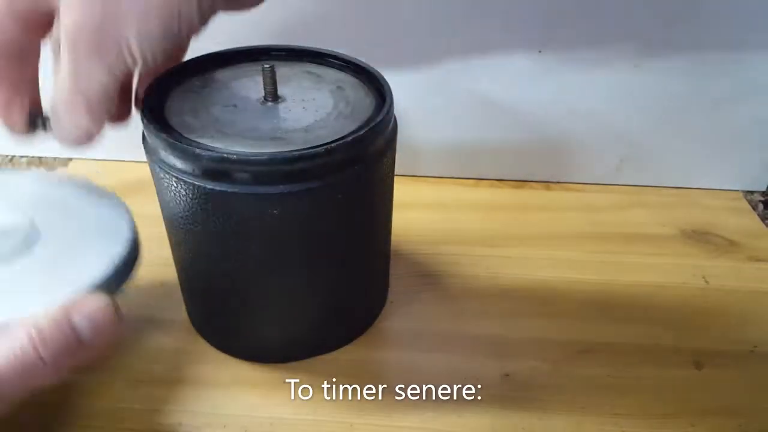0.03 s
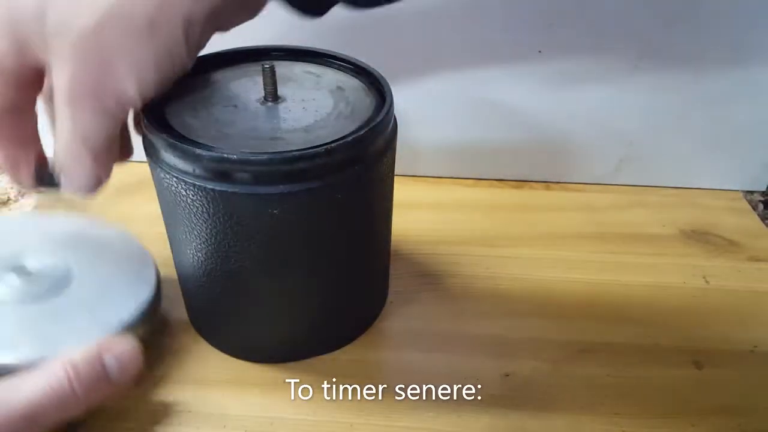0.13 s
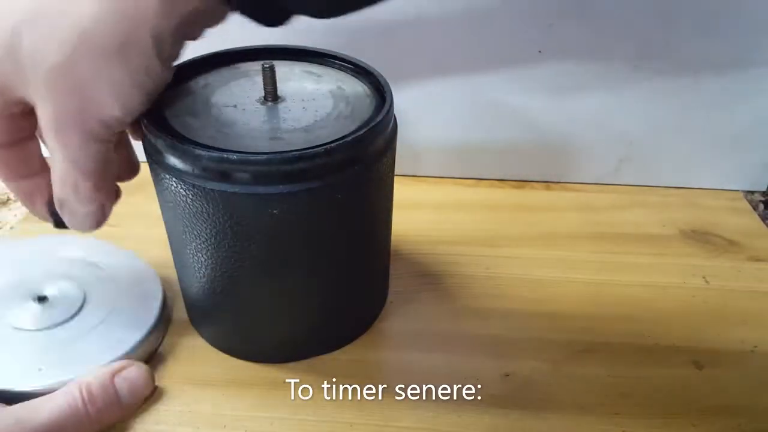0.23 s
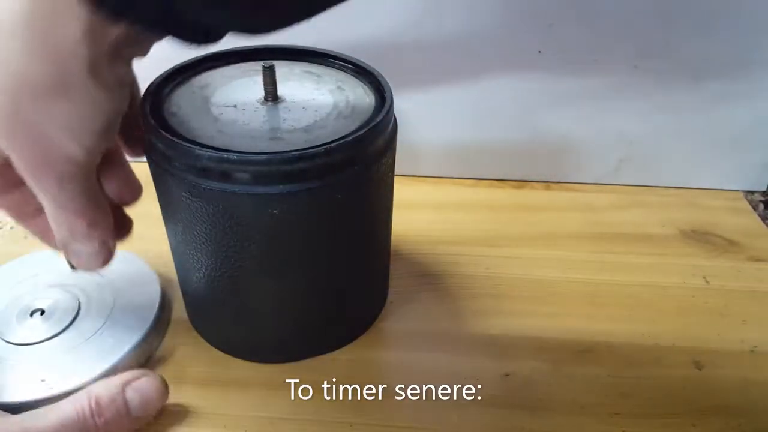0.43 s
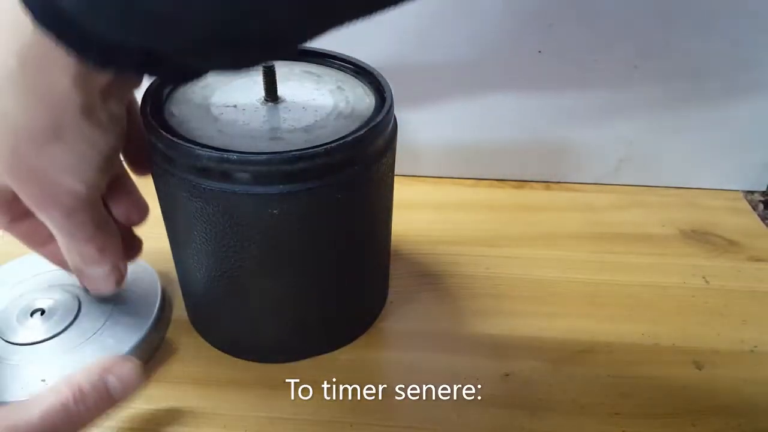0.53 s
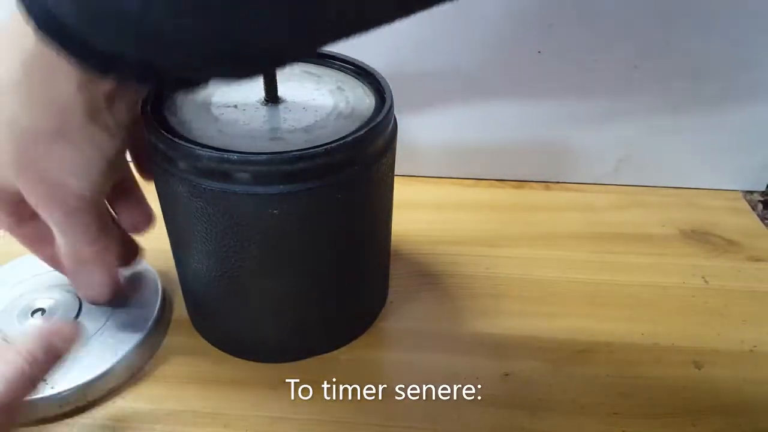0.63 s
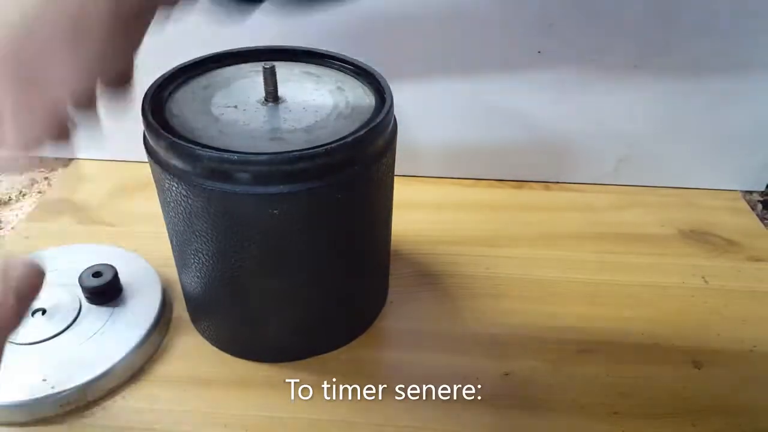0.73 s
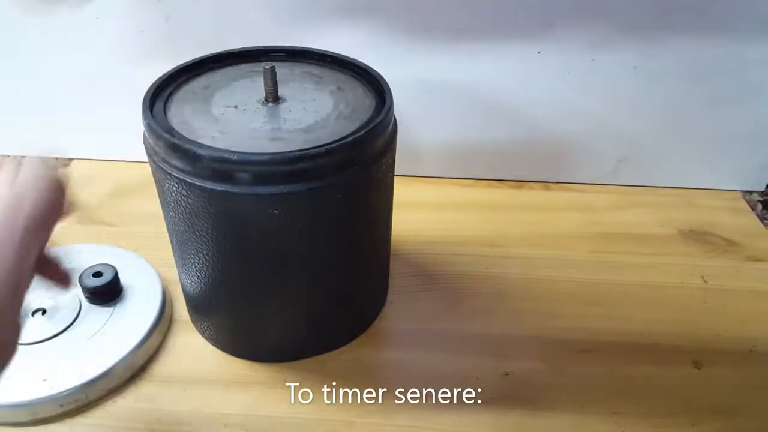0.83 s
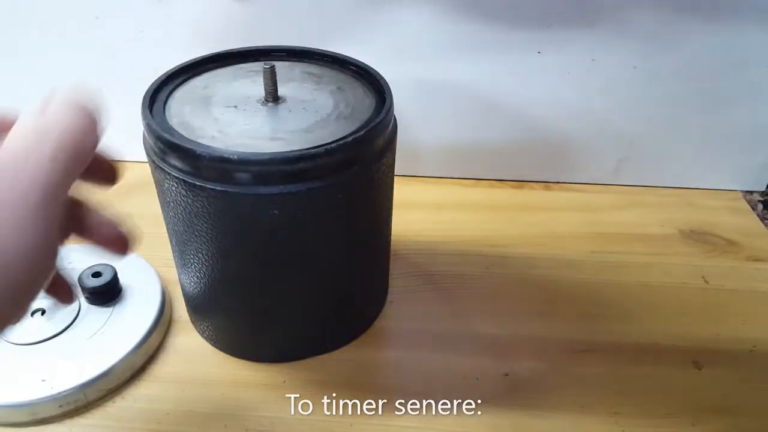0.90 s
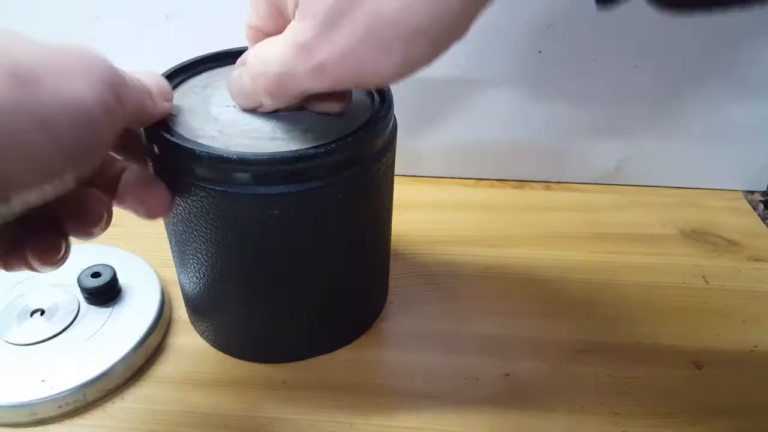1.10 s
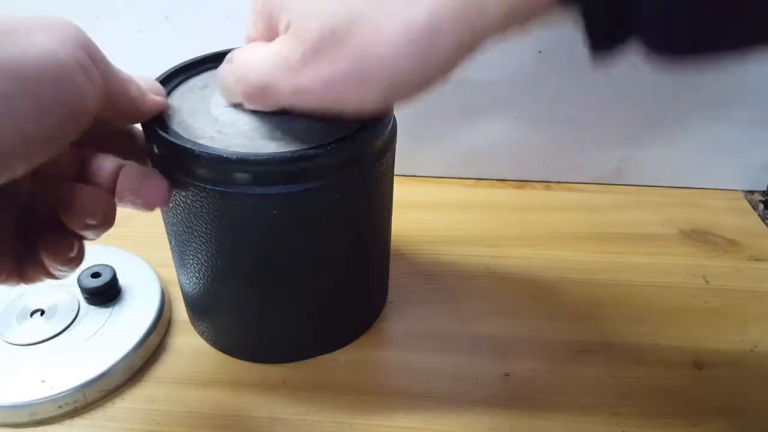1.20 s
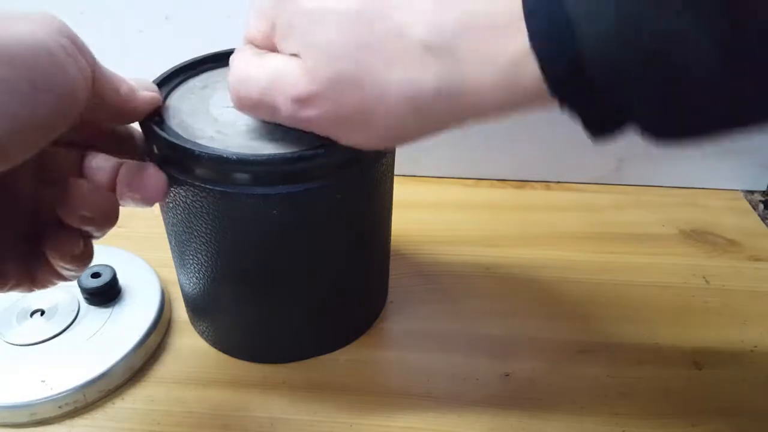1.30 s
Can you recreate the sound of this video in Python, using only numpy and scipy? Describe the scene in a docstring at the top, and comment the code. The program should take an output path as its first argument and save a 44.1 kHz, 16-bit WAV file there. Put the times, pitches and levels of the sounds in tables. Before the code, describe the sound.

Metal lid clinks and rattles flat on wood, followed by a small knob bouncing.

```python
"""In a small dry room with a faint mains hum, a round metal lid is laid on a wooden table.
Its rim touches, it rocks, drops flat and chatters; then a small knob is dropped on it and bounces.
Each hit is a hollow knock, a noisy clack, a ring of the metal and a thud of the table top;
the knob's last bounce is only a tick. Last, hands brush the pot beside it (swells of noise)
and bump it (ticks and short low tones). All is close and a little to the left."""
import sys
import numpy as np
from scipy import signal
from scipy.fft import rfft, irfft, next_fast_len
from scipy.io import wavfile
from scipy.ndimage import map_coordinates

SR = 44100
rng = np.random.default_rng(int(sys.argv[2]) if len(sys.argv) > 2 else 0)


def store_wav(level_fs):
    """Save 16-bit WAV to argv[1]."""
    pcm = np.round(np.clip(np.atleast_2d(level_fs), -1, 1) * 32767)
    wavfile.write(sys.argv[1], SR, pcm.T.astype(np.int16))


N = 59535
SCENE_T = np.arange(N) / SR  # seconds since the start
HIT_T = np.arange(12288) / SR  # seconds since one hit


def amp(db):
    """Turn decibels into a gain."""
    return 10 ** (np.asarray(db) / 20)


def fade(t60):
    """Die away by 60 dB in t60 seconds, the fade time."""
    return np.exp(-np.log(1000) * HIT_T / t60)


def rise(seconds):
    """Grow from silence toward full level."""
    return 1 - np.exp(-HIT_T / seconds)


def unit(x):
    """Scale x to an average (rms) level of 1."""
    return x / np.sqrt(np.mean(x ** 2) + 1e-20)


def along(points, hz):
    """Read a value between a table's rows, on a log frequency scale."""
    f, values = np.transpose(points)
    return np.interp(np.log(hz + 1), np.log(f + 1), values)


def filtered(x, response):
    """Multiply each frequency in x by response(hz)."""
    n = x.shape[-1]
    padded = next_fast_len(n + 2048)
    return irfft(rfft(x, padded) * response(np.fft.rfftfreq(padded, 1 / SR)), padded)[..., :n]


# how alike noise is in the two ears: f/Hz, likeness (1 = the same)
EAR_LIKENESS = [(100, 0.54), (400, 1), (1000, 0.44), (2500, 0.31), (6000, .05)]
def noise(spectrum, size):
    """Shaped stereo noise, alike in both ears in the bass and unrelated in the treble."""
    def response(hz):
        angle = np.arccos(np.clip(along(EAR_LIKENESS, hz), -1, 1)) / 2
        return amp(along(spectrum, hz)) * [np.cos(angle), np.sin(angle)]
    mid, side = filtered(rng.standard_normal((2, size)), response)
    return unit(np.array([mid + side, mid - side]))


# tones of the mains hum: f/Hz, level/dB
HUM_TONES = [(49.7, -63), (199.5, -74), (300, -73.5), (400, -76), (500, -88.5)]
# swell of the lowest tone: t/s, added level/dB
HUM_SWELL = [(0, 2.5), (.2, 0), (.5, 1.5), (.7, 8), (.82, 4), (.95, 0), (1.35, -3.5)]
# tone colour of the room's air: f/Hz, relative level/dB
AIR_COLOUR = [(25, -15.5), (60, -13.5), (100, -14.5), (300, -24.5), (500, -23), (800, -30.5), (2500, -34),
              (3900, -32), (5200, -38.5), (9000, -37.5), (15500, -43.5)]
def background():
    """The mains hums over the quiet hiss of the room."""
    lowest, *upper = [np.sqrt(2) * amp(db) * np.sin(2 * np.pi * (hz * SCENE_T + rng.random()))
                      for hz, db in HUM_TONES]
    swell = amp(np.interp(SCENE_T, *np.transpose(HUM_SWELL)))
    return lowest * swell + sum(upper) + amp(-65) * noise(AIR_COLOUR, N)


# how long the room echoes: f/Hz, fade time/s
ROOM_FADE = [(150, .26), (500, .18), (1200, .165), (4000, .14), (12000, .11)]
# tone colour of the echo: f/Hz, level/dB
ROOM_COLOUR = [(150, -14), (500, -5), (1100, -16), (2500, -11.5), (6000, -17), (14000, -11.5)]
def room(x):
    """Near walls throw back a short echo of x whose treble dies first."""
    hiss = noise([(20, 0), (20000, 0)], len(HIT_T))
    hz, t, bands = signal.stft(hiss, SR, nperseg=256)
    decay = np.exp(-np.log(1000) * t / along(ROOM_FADE, hz)[:, None])
    tail = signal.istft(bands * decay, SR, nperseg=256)[1][:, :len(HIT_T)]
    delay_s, build_s = 0.001, 0.0017
    tail *= 1 - np.exp(-np.maximum(HIT_T - delay_s, 0) / build_s)
    tail = filtered(tail / np.linalg.norm(tail[0]), lambda f: amp(along(ROOM_COLOUR, f)))
    return signal.fftconvolve(x, tail, axes=1)[:, :N]


# strokes of skin on the pot: peak t/s, half width/s, level/dB
STROKES = [(1.081, 0.0065, -54), (1.097, .009, -52.5), (1.07, 0.037, -61.5), (1.252, .0095, -49)]
# tone colours of skin and sleeve: f/Hz, relative level/dB
SKIN_COLOUR = [(60, -21), (150, -1), (300, -3), (560, -2.5), (900, -8.5), (1400, -9), (2500, -14.5),
               (5000, -21.5), (15500, -26.5)]
SLEEVE_COLOUR = [(100, -10), (250, 2), (800, -11.5), (1500, -13), (3400, -16), (6000, -24.5),
                 (15500, -27.5)]
def rubbing(grains_per_s=630, grain_db=1):
    """Skin rubs the pot with a grainy sound; a sleeve swishes past more smoothly."""
    def swell(s, width_s, db):
        return amp(db) * np.exp(-((SCENE_T - s) / width_s) ** 2 / 2)
    grain = map_coordinates(rng.standard_normal(N), [SCENE_T * grains_per_s])
    friction = unit(noise(SKIN_COLOUR, N) * amp(grain_db * grain))
    skin = sum(swell(*stroke) for stroke in STROKES) * friction
    sleeve = swell(s=1.184, width_s=0.039, db=-54.5) * noise(SLEEVE_COLOUR, N)
    return skin + sleeve


# light ticks (the knob's last tiny bounce on the lid, then fingers touching the pot): t/s, level/dB
TICKS = [(0.6719, -43), (1.017, -55), (1.0585, -54), (1.2415, -47), (1.2471, -45.5), (1.2539, -38)]
# tone colour of a tick: f/Hz, relative level/dB
TICK_COLOUR = [(300, -6), (1300, 9.5), (3000, -13.5), (6000, -4), (12000, -8.5), (16000, -11.5)]
# fingers bumping the pot: t/s, f/Hz, level/dB
BUMPS = [(1.0575, 378, -42.5), (1.0595, 850, -55), (1.080, 430, -81), (1.094, 556, -49), (1.113, 400, -48),
         (1.164, 350, -56), (1.189, 260, -57.5), (1.223, 247, -47), (1.2414, 312, -40.5),
         (1.246, 788, -46.5), (1.257, 225, -32.5), (1.256, 586, -48), (1.268, 290, -39)]
def ticks_and_bumps():
    """The knob's last bounce and fingers on the pot tick; finger bumps make soft, short tones."""
    out = np.zeros((2, N))
    for s, db in TICKS:
        add(out, s, amp(db) * noise(TICK_COLOUR, len(HIT_T)) * fade(0.012))
    for s, hz, db in BUMPS:
        add(out, s, -amp(db) * np.sin(2 * np.pi * hz * HIT_T) * fade(0.057) * rise(0.00041))
    return out


def add(out, s, sound):
    """Mix a sound into out, starting at s seconds."""
    start = int(round(s * SR))
    out[:, start:start + sound.shape[-1]] += sound[..., :N - start]


# tones of the wooden table: f/Hz, relative level/dB, fade time/s
WOOD_TONES = [(55, -15, 0.023), (166.8, -9, 0.034), (241.5, -18, 0.3), (294.1, 1, 0.056), (400, -4, 0.029)]
def thud():
    """A hit shakes the table top, which gives a few low tones."""
    tones = sum(amp(db) * fade(t60) * np.sin(2 * np.pi * hz * HIT_T) for hz, db, t60 in WOOD_TONES)
    return rise(0.0019) * tones


# tone colour of the lid's clack and weak tones: f/Hz, relative level/dB
CLACK_COLOUR = [(200, -32.5), (550, -16), (800, -1.5), (1300, 4.5), (1700, 1.5), (2400, 1.5), (4000, -2),
                (5200, -10), (7000, -14), (8000, -20.5), (9000, -15.5), (11000, -31.5), (15500, -34)]
def weak_lid_tones(count, low_hz=708.6, high_hz=15490, scatter_db=3):
    """Pick pitches and gains for the lid's weak tones, spread evenly as in any metal plate."""
    hz = low_hz + (high_hz - low_hz) * (np.arange(count) + rng.random(count)) / count
    gain = amp(along(CLACK_COLOUR, hz) + scatter_db * rng.standard_normal(count))
    return hz, gain / np.linalg.norm(gain)


def clack(weak_tones, hardness):
    """A burst of noise and a shimmer of the lid's weak tones; harder hits are brighter."""
    size = len(HIT_T)
    burst = noise(CLACK_COLOUR, size) * fade(0.034)
    hz, gain = weak_tones
    spectrum = np.zeros((2, size // 2 + 1), complex)
    spectrum[:, (hz * size / SR).astype(int)] = gain * np.exp(2j * np.pi * rng.random((2, len(hz))))
    shimmer = amp(-9.5) * unit(irfft(spectrum, size)) * fade(0.08)
    return filtered(burst + shimmer, lambda f: amp(hardness * np.log2(np.hypot(1, f / 2000))))


# the lid's main tones: f/Hz, left minus right/dB, then level/dB for a rim, a flat and a knob hit
LID_TONES = [(1520, 11.5, -15.5, -8, 0), (1750, -1.5, -21.5, -9.5, -33), (1800, 4.5, -5, -12, -38),
             (2230, 7.5, -3, -6.5, -13), (2680, 13.5, -2, 2.5, -8.5), (3170, -2, 7.5, -13.5, -22),
             (3218, -1, -21, -8.5, -2), (3865, 6.5, -4, -0.5, -21), (4410, 4, -8.5, -9.5, -0.5),
             (5145, -4.5, -16.5, -2, -20.5), (5710, -9.5, -3, -14.5, -5.5), (6706, 5.5, -9, -8, 2.5),
             (7205, 3.5, -11, -23.5, -10), (7495, 0.5, -27.5, -9, -28), (8560, 0.5, -13, -11.5, 2),
             (8990, 0, -17, -15, -3.5), (9447, 4, -28.5, -28.5, -15), (9960, 1.5, -16.5, -18, -23.5),
             (10470, 7, -28, -23.5, -11), (11660, -2, -24, -25.5, -15), (12735, 3.5, -29.5, -24.5, -24),
             (13320, 4.5, -33.5, -23.5, -18), (14500, 7, -32.5, -27.5, -27), (15060, 3, -34, -24, -29.5)]
# how long the lid rings: f/Hz, fade time/s
LID_FADE = [(1500, .11), (2700, .11), (3160, .16), (3868, .105), (4375, .17), (5700, .12), (15000, .09)]
def ring(place, scatter_db=1.2):
    """The lid rings with a mix of tones that depends on where it is hit and differs in each ear."""
    hz, pan_db, *levels = np.transpose(LID_TONES)
    tones = np.array([fade(along(LID_FADE, f)) * np.exp(2j * np.pi * f * HIT_T) for f in hz])
    level_db = levels[place] + scatter_db * rng.standard_normal(len(hz))
    gain = amp(level_db + np.array([pan_db, -pan_db]) / 2)
    phase = np.exp(2j * np.pi * rng.random(gain.shape))
    return ((gain * phase) @ tones).real * rise(0.0017) / 2


def knock(hz, peak_s=0.0014, low_hz=717):
    """A hollow knock of a few cycles; the small lid gives off little sound below low_hz."""
    age = HIT_T / peak_s
    swell = (age * np.exp(1 - age)) ** 1.6  # a higher power makes it shorter
    bass_cut = signal.butter(5, low_hz, "high", fs=SR, output="sos")
    return signal.sosfilt(bass_cut, swell * np.cos(2 * np.pi * hz * HIT_T))


# hits of lid on table, then knob on lid: t/s, knock f/Hz, knock level/dB, clack level/dB,
# ring level/dB, thud level/dB, hardness/(dB per octave added to the clack above 2 kHz)
RIM_HITS = [(.2306, 1113, -6.5, -13, -19, -46.5, -2), (.2405, 1030, -20.5, -22, -40, -34.5, -3),
            (.2470, 1105, -32, -29.5, -40.5, -42.5, -2), (.2525, 1080, -20, -20.5, -31.5, -36.5, 0.5)]
ROCKING_HITS = [(.3040, 1111, -33.5, -55.5, -61.5, -54, 2.5), (.3135, 1070, -26, -45.5, -55, -61, -3),
                (.3175, 1114, -25, -42.5, -52, -43, -5.5), (.3225, 1065, -14.5, -30.5, -54, -36.5, -4),
                (.3275, 1108, -13.5, -28.5, -46, -27.5, -4), (.3315, 1197, -8, -24.5, -38, -27.5, -7),
                (.3345, 1065, -14.5, -26, -41.5, -35, -5.5), (.338, 1170, -13, -18.5, -51, -40, -8.5)]
FLAT_HITS = [(.3532, 1145, -11, -20.5, -25.5, -30.5, 1), (.3580, 910, -5, -17, -20.5, -19.5, -1),
             (.3645, 886, -23, -25, -27, -58, .3), (.3700, 1065, -18.5, -19, -31.5, -35.5, .3),
             (.3780, 833, -16, -21, -29, -39, .3), (.3850, 782, -20.5, -23.5, -37.5, -47, 1),
             (.3930, 800, -25, -28.5, -40.5, -44.5, 1)]
KNOB_HITS = [(.5982, 891, -17, -19, -27.5, -38, 0.5), (.6203, 863, -26, -26.5, -41.5, -43, 1.5),
             (.6445, 965, -28, -39.5, -59.5, -42, 1)]
def lid_hits(hits, place, weak_tones):
    """Each hit makes the lid knock, clack and ring, and the table thud."""
    out = np.zeros((2, N))
    for s, hz, knock_db, clack_db, ring_db, thud_db, hardness in hits:
        impact = amp(knock_db) * knock(hz) + amp(clack_db) * clack(weak_tones, hardness)
        add(out, s, impact + amp(ring_db) * ring(place) + amp(thud_db) * thud())
    return out


# how much louder the left ear hears the action: f/Hz, left minus right/dB
LEFT_BOOST = [(400, -0.5), (1000, 1.5), (2200, 2.5), (4000, 0.5), (8000, 1), (14000, 2.5)]
def from_left(x, lead_s=0.00021):
    """Sound from the left reaches the left ear earlier and, above the bass, louder."""
    side = np.array([[0.5], [-0.5]])
    return filtered(x, lambda hz: amp(side * along(LEFT_BOOST, hz))
                    * np.exp(2j * np.pi * hz * side * lead_s))


def scene():
    """Lid, knob and hands sound left of centre with their echoes, over the hum."""
    weak_tones = weak_lid_tones(count=60)
    rim, flat, knob = range(3)  # which level column of LID_TONES to use
    moves = [(RIM_HITS, rim), (ROCKING_HITS, flat), (FLAT_HITS, flat), (KNOB_HITS, knob)]
    metal = [lid_hits(hits, place, weak_tones) for hits, place in moves]
    soft = ticks_and_bumps() + rubbing()
    near = sum(part + room(part) for part in metal)
    near += soft + amp(-5) * room(soft)  # less echo: most of these come from the nearer pot
    return from_left(near) + background()


def record(dry):
    """Cut away the treble above 16 kHz."""
    return filtered(dry, lambda hz: hz < 16000)


dry = scene()
out = record(dry)
store_wav(out)
```